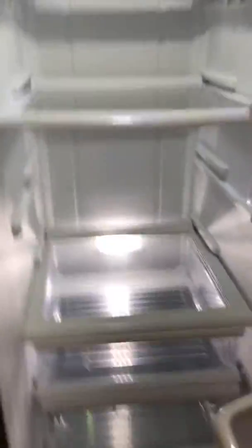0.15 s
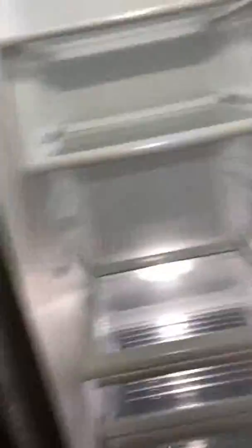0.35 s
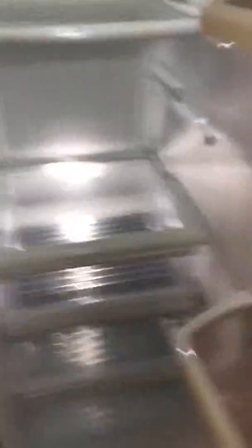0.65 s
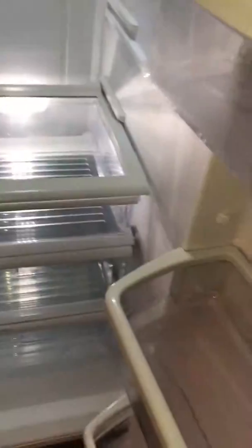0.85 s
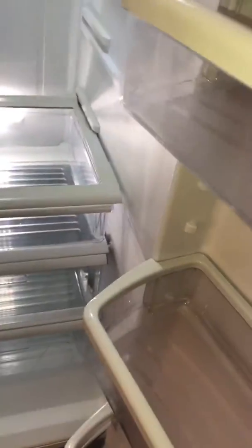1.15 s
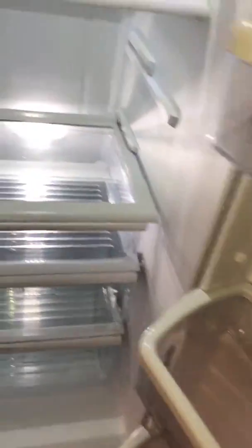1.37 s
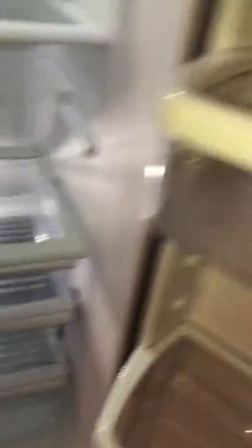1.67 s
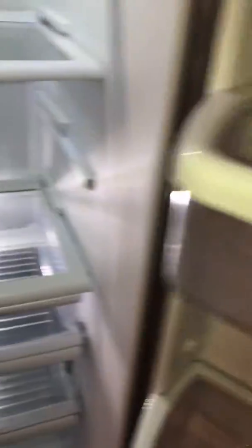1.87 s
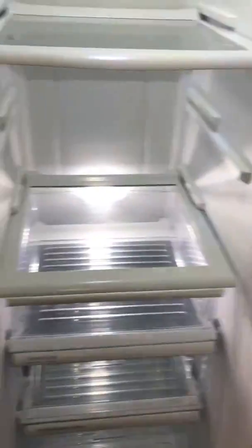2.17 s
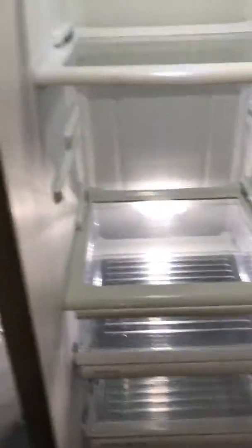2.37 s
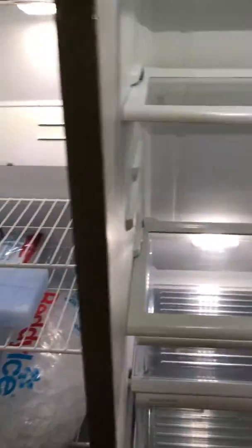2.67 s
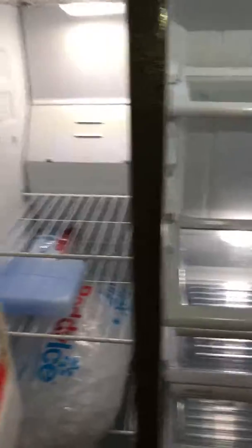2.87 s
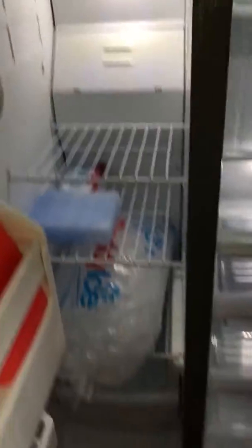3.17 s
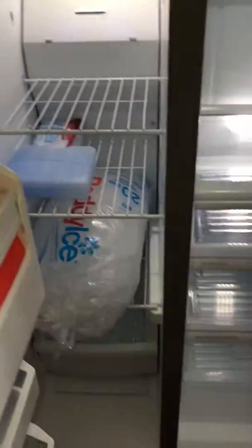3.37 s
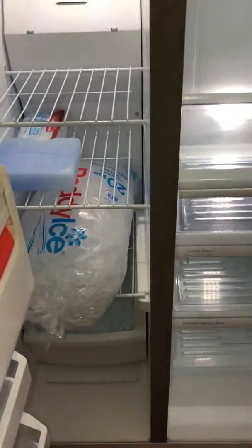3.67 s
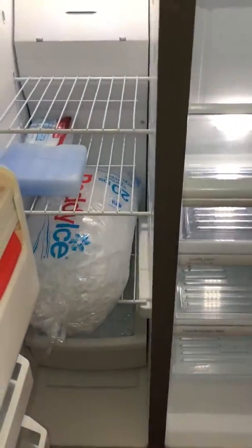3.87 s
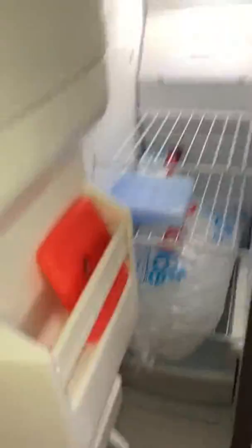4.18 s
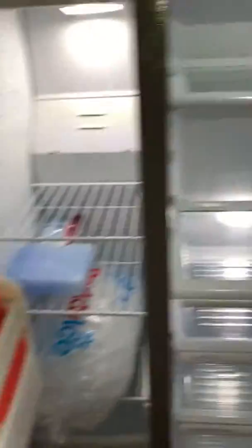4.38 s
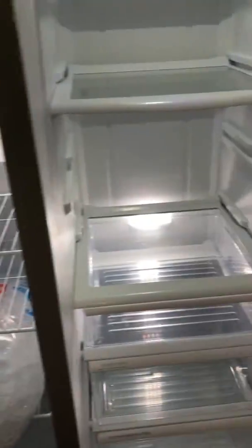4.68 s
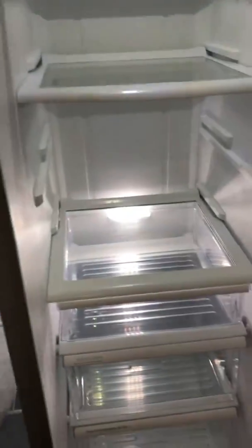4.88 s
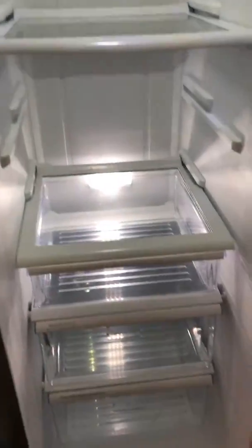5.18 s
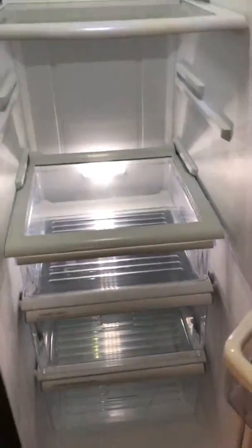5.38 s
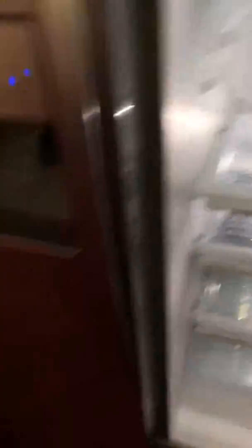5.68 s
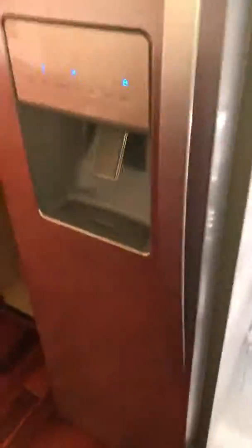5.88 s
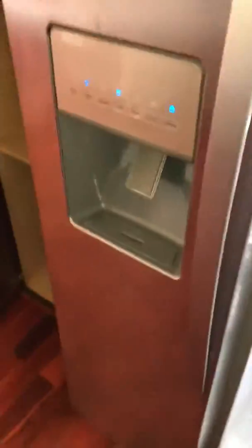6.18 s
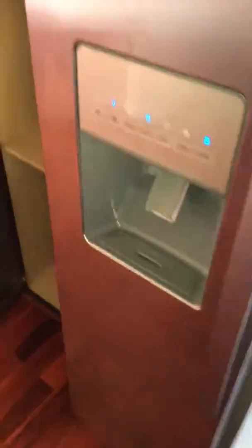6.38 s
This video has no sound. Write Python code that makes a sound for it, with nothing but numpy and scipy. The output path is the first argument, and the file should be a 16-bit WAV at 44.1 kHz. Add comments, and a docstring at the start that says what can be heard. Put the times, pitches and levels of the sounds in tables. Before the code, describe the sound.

Close handling of a refrigerator: hands and rubber seals rub and crackle while plastic bins tick and knock. A door swings with a rattling, deep thump, then things settle to soft thuds and scattered clicks over low hum and airy noise. After a shelf clinks, one door is slammed with a sharp smack and a bassy thud that echoes briefly in the kitchen. A little rustling and a last click follow.

```python
"""Round an open refrigerator

Someone walks round an open refrigerator in a kitchen, swings its doors and shuts one with a slam.
Impacts on plastic bins and gaskets click and knock; doors and steps thud as damped oscillations and
drive the modes of the panels. Friction of hands and rubber seals gives rumble, scuff and crackle.
The room reverberates briefly after each blow, over the refrigerator's low hum and air noise."""
import sys
import numpy as np
from scipy import signal
from scipy.fft import rfft, irfft
from scipy.io import wavfile

SR = 44100
rng = np.random.default_rng(int(sys.argv[2]) if len(sys.argv) > 2 else 0)


def int16_out(signal):
    """Quantize to a 16-bit WAV file."""
    q = np.round(np.clip(np.atleast_2d(signal).T, -1, 1) * 32767)
    wavfile.write(sys.argv[1], SR, q.astype(np.int16))


N = 288414


def from_db(db):
    """Amplitude ratio of a level in decibels."""
    return 10 ** (np.asarray(db) / 20)


def rms_one(x):
    """Normalisation to rms 1."""
    return x / np.sqrt(np.mean(x ** 2) + 1e-20)


def at_hz(points, hz, column=1):
    """Interpolation of a table column on a logarithmic frequency axis."""
    points = np.array(points)
    return np.interp(np.log(hz), np.log(points[:, 0]), points[:, column])


def band(x, low_hz, high_hz):
    """Butterworth band-pass filtering."""
    return signal.sosfilt(signal.butter(2, [low_hz, high_hz], "band", fs=SR, output="sos"), x)


def coloured(x, spectrum):
    """Spectral shaping of a white signal, at rms 1."""
    hz = np.maximum(np.fft.rfftfreq(N, 1 / SR), 1)
    return rms_one(irfft(rfft(x) * from_db(at_hz(spectrum, hz)), N))


def drift(rate_hz):
    """Slow random modulation: low-passed noise at rms 1."""
    step, settle = 40, 2000
    pole = np.exp(-2 * np.pi * rate_hz * step / SR)
    white = rng.standard_normal(N // step + settle + 2)
    slow = signal.lfilter([1], [1, -2 * pole, pole * pole], white)[settle:]
    return np.interp(np.arange(N) / step, np.arange(len(slow)), rms_one(slow))


def ring(force, hz, t60):
    """Damped resonator: a unit impulse starts a decaying sine of amplitude 1."""
    radius, angle = from_db(-60 / (t60 * SR)), 2 * np.pi * hz / SR
    return signal.lfilter([0, np.sin(angle)], [1, -2 * radius * np.cos(angle), radius ** 2], force + 1e-18)


def refrigerator():
    """Superposition of compressor hum, lamp-supply whine, wavering air noise and the freezer fan's hiss."""
    # compressor tones: (frequency [Hz], rms level [dB])
    hum_tones = [(118.4, -74), (355.3, -78)]
    # hiss of the open freezer's fan, heard when close by: (time [s], level [dB])
    fan_levels = [(3.4, -96), (3.55, -79), (3.95, -88), (4.3, -95), (4.6, -91)]
    # spectrum of the moving air: (frequency [Hz], relative density [dB])
    air_spectrum = [(15, -41), (25, -2.5), (108, -0.5), (177, 0.5), (288, -6.5), (358, -5.5), (568, -14),
                    (1220, -20.5), (3150, -29.5), (3700, -31), (11000, -40), (15200, -40), (16500, -59)]
    t = np.arange(N) / SR
    whine_hz, fan_band_hz = 12662, (3200, 4400)
    hum = sum(np.sqrt(2) * from_db(db) * np.sin(2 * np.pi * hz * t) for hz, db in hum_tones)
    whine = from_db(-99 + 3 * drift(0.8)) * np.sin(2 * np.pi * whine_hz * t)
    fan_gain = from_db(np.interp(t, *np.transpose(fan_levels)))
    fan = fan_gain * rms_one(band(rng.standard_normal(N), *fan_band_hz))
    air = from_db(-61 + 1.3 * drift(2.8)) * coloured(rng.standard_normal(N), air_spectrum)
    return air + hum + whine + fan


def rubbing():
    """Friction noise: panel rumble, scuff and dense crackle swell, hold and decay with each stroke."""
    # strokes of hands, seals and bins: (start [s], hold [s], rumble [dB], scuff [dB], crackle [dB])
    strokes = [(0.0, 0.12, -64, -68, -79), (0.24, 0.084, -72, -76, -70.5), (0.389, 0.059, -47, -82, -67),
               (0.5, 0.064, -51.5, -92, -74.5), (0.62, .18, -76, -93, -74.5), (0.9, .22, -66, -88, -83),
               (1.13, .19, -59, -50.5, -67), (1.271, 0.16, -51, -64.5, -61.5),
               (1.43, 0.19, -74, -56.5, -51.5), (1.55, .14, -50, -56, -57), (1.78, 0.31, -59.5, -77, -76),
               (1.968, .16, -30.5, -43.5, -53), (2.169, 0.32, -51.5, -68, -65.5),
               (2.72, 0.39, -70, -81, -76.5), (3.29, 0.19, -55, -69.5, -93), (4.43, 0.086, -50.5, -64, -79),
               (4.5, 0.16, -77, -73, -81), (4.9, 0.52, -72, -75, -80), (5.41, 0.091, -40.5, -74.5, -79),
               (5.56, .13, -48, -53.5, -67.5), (5.74, 0.063, -30.5, -43.5, -59),
               (5.84, 0.17, -44.5, -60.5, -67), (6.03, 0.16, -58, -67, -68),
               (6.22, 0.08, -44.5, -71.5, -89), (6.34, 0.15, -69.5, -73, -82)]
    # decay after a stroke, one row each for rumble, scuff and crackle: (rate [dB/s])
    fade_rates = [
        [137],
        [93],
        [360],
    ]
    # spectrum of the scuffing: (frequency [Hz], relative density [dB])
    scuff_spectrum = [(150, -25.5), (250, 1.5), (426, 2), (617, 1), (1530, -3.5), (2100, -5.5), (3670, -10),
                      (6000, -19), (7800, -53.5), (13200, -120)]
    # spectrum of the crackle: (frequency [Hz], relative density [dB])
    crackle_spectrum = [(1760, -36.5), (3000, 2.5), (3240, -1), (4000, -4.5), (5800, -1), (8470, -4),
                        (15500, -4.5)]
    swell_s, grains_per_s = 0.025, 900
    gains = np.zeros((3, N))
    for start, hold, *levels_db in strokes:
        i = round(start * SR)
        t = np.arange(min(N - i, SR)) / SR
        swell = np.minimum(t / swell_s, 1)
        gains[:, i:i + len(t)] += swell * from_db(np.c_[levels_db] - fade_rates * np.maximum(t - hold, 0))
    rumble = band(rng.standard_normal(N), 69, 220) * from_db(6.4 * drift(3.2))
    scuff = coloured(rng.standard_normal(N), scuff_spectrum) * from_db(2 * drift(20))
    grain_onsets = rng.random(N) < grains_per_s * from_db(5 * drift(20)) / SR
    grains = grain_onsets * from_db(6.87 * np.minimum(rng.exponential(1, N), 5))
    grainy_noise = rng.standard_normal(N) * (1 + 0.82 * grains)
    crackle = coloured(grainy_noise, crackle_spectrum) * from_db(1.2 * drift(40))
    return gains[0] * rms_one(rumble) + gains[1] * rms_one(scuff) + gains[2] * rms_one(crackle)


def knocks():
    """Impact noise: each knock, tick or scrape is a decaying burst of tiny contacts in three bands.
    Returns the direct sound, the clicks sent to the walls and the impulses on the panels."""
    # knocks of bins, latch and gasket: (time [s], snap level [dB], snap frequency [Hz],
    # hollow level [dB], hollow frequency [Hz], fizz level [dB], gain to walls and panels [dB])
    hollow_knocks = [ (0.308, -59, 3160, -55, 494, -68, 1), (0.4204, -40.5, 1780, -49, 537, -70, -31),
                     (0.512, -72, 2200, -50, 700, -80, -10), (1.1352, -45.5, 1850, -41, 810, -49.5, 1),
                     (1.376, -51.5, 1840, -55, 565, -43.5, -10), (1.4805, -44.5, 2960, -48.5, 517, -45, 11),
                     (1.55, -55, 4500, -53, 550, -44, -5), (1.6312, -39, 4670, -43, 520, -35.5, -3),
                     (1.66, -40.5, 3200, -37.5, 770, -41.5, 6.5), (1.9723, -34.5, 3750, -36, 593, -32, 1),
                     (1.996, -39, 1940, -34.5, 1270, -46, -10), (2.0416, -44, 2500, -33, 780, -45, 3),
                     (2.088, -23.5, 4100, -31.5, 1510, -27, -2), (2.265, -46.5, 4570, -45, 1305, -50, -12),
                     (2.3193, -52, 4030, -57, 730, -56, -8), (2.4464, -51, 3330, -59, 1500, -51, -7),
                     (2.9254, -43.5, 2370, -51, 1070, -50, 1), (3.2875, -71, 1650, -62, 766, -62, 7),
                     (3.5056, -64, 4450, -74, 861, -63.5, -4), (4.415, -39, 3770, -60, 760, -45.5, -4),
                     (4.5008, -43, 3520, -43, 1010, -44.5, 3.5), (5.114, -66, 3500, -70, 694, -76, -1),
                     (5.4607, -63.5, 4500, -59, 541, -66.5, -7), (5.5193, -42, 3350, -48, 900, -44.5, 0),
                     (5.5831, -36, 2035, -37.5, 1505, -53, 3.5), (5.687, -27.5, 2070, -28, 1070, -46, 13),
                     (5.6985, -15.5, 4060, -21.5, 1100, -15.5, 0),
                     (6.331, -42, 3400, -43, 1000, -47.5, 7.5)]
    # dry ticks of plastic and gasket: (time [s], snap level [dB], snap frequency [Hz], fizz level [dB])
    ticks = [(0.4783, -50, 2240, -69), (0.748, -49, 4800, -58), (0.7816, -39.5, 3900, -52),
             (1.269, -39, 2040, -60), (1.2924, -53, 2170, -58), (1.346, -54, 2680, -45),
             (1.363, -60, 2140, -39.5), (1.4217, -44, 2440, -45), (1.8824, -71, 2010, -59),
             (2.1652, -47, 2000, -43), (4.1724, -60, 1570, -80), (4.84, -62.5, 4040, -56),
             (5.4, -61, 3460, -62), (6.1007, -39, 2400, -65)]
    # short scrapes: (time [s], snap level [dB], snap frequency [Hz], hollow level [dB], fizz level [dB])
    scrapes = [(0.262, -56, 4020, -67, -64), (0.4011, -45, 1860, -35.5, -54), (0.4354, -58, 1900, -68, -54),
               (0.46, -57, 4500, -63, -67), (0.5403, -56.5, 2550, -66, -62),
               (0.7945, -55.5, 2980, -64, -77), (1.958, -47, 4370, -51, -32),
               (2.803, -58.5, 1750, -63, -66), (3.328, -67, 1530, -44, -75.5),
               (5.3874, -66, 1510, -50.5, -70.5), (6.1194, -52, 3580, -65, -60.5)]
    # kinds of contact: (t60 [s], rise [s]); tick and scrape also (gain to walls and panels [dB])
    knock, tick, scrape = (0.081, 0.0014), (0.015, 0.0003, -8.5), (0.093, 0.009, -13.5)
    scrape_hollow_hz, rap_db = 680, -15.5
    events = [(*row, *knock, send_db) for *row, send_db in hollow_knocks]
    events += [(*row, -np.inf, scrape_hollow_hz, fizz_db, *tick) for *row, fizz_db in ticks]   # no hollow
    events += [(*row, scrape_hollow_hz, fizz_db, *scrape) for *row, fizz_db in scrapes]
    direct, to_walls, rap = np.zeros((3, N + SR))
    t = np.arange(SR // 4) / SR
    click = (t == 0) + 1e-18
    for start, snap_db, snap_hz, hollow_db, hollow_hz, fizz_db, t60, rise, send_db in events:
        i = round(start * SR)
        fizz_top_hz = min(85 / rise, 18000)   # slow scrapes are duller than sharp ticks
        # (level [dB], low edge [Hz], high edge [Hz], t60 [s], polarity that joins adjacent bands)
        bands = [(snap_db, snap_hz / 1.605, snap_hz * 1.5, t60, 1),
                 (hollow_db, hollow_hz / 2.46, hollow_hz * 1.38, 1.5 * t60, -1),
                 (fizz_db, 5000, fizz_top_hz, 0.7 * t60, -1)]
        for level_db, low, high, band_t60, polarity in bands:
            envelope = from_db(level_db - 60 * t / band_t60) * (1 - np.exp(-t / rise))
            direct[i:i + len(t)] += rms_one(band(rng.standard_normal(len(t)), low, high)) * envelope
            # the burst's energy gathered into one click
            wall_click = rms_one(band(click, low, high)) * np.sqrt(np.mean(envelope ** 2))
            to_walls[i:i + len(t)] += polarity * wall_click * from_db(send_db)
        rap[i] += from_db(hollow_db + send_db + rap_db)
    return direct[:N], to_walls[:N], rap[:N]


def panels(force):
    """Modal response: door and cabinet ring as a sum of damped resonators."""
    # modes of door and cabinet: (frequency [Hz], gain [dB], t60 [s])
    modes = [(64, -20, 0.6), (88.8, -7.5, 0.38), (108, -11.5, 0.25), (158.9, -16, 0.36), (240, -5.5, 0.19),
             (292, -13.5, 0.41), (323, -4, 0.16), (453.5, -23, 0.28), (537, -17.5, 0.23), (590, -20.5, .25),
             (693, -25, .2), (770, -9, .2), (886, -26.5, .2), (1014, -22, 0.19), (1310, -34.5, .15)]
    return sum(from_db(db) * ring(force, hz, t60) for hz, db, t60 in modes)


def thuds():
    """Damped oscillation, one sine per thud or tap. Returns the sound and the thuds' push on the panels."""
    # thuds of doors and steps: (time [s], level [dB], frequency [Hz], t60 [s])
    blows = [(0.32, -43, 108, 0.097), (0.406, -44, 294, 0.1), (0.505, -50, 226, 0.17),
             (0.751, -35, 102, 0.082), (0.905, -45, 183.4, 0.22), (1.188, -42, 107, 0.22),
             (1.244, -36, 78, 0.21), (1.342, -35, 69, 0.12), (1.64, -23.5, 161.5, 0.077),
             (1.657, -37, 63, 0.12), (1.752, -38.5, 101.2, 0.28), (1.977, -29, 206, 0.1),
             (2.016, -19.5, 100.4, 0.11), (2.045, -27.5, 226, 0.16), (2.059, -12.5, 90.3, 0.089),
             (2.101, -22, 85, 0.15), (2.269, -33, 96, 0.054), (3.3, -36, 92.4, 0.34),
             (3.335, -29, 71.5, 0.15), (3.42, -41, 92, 0.1), (4.426, -38, 216, 0.18),
             (4.445, -37, 127, 0.084), (4.507, -48.5, 64, 0.18), (5.51, -34, 199, 0.13),
             (5.704, -3.5, 122.4, 0.07), (5.722, -5.5, 90.7, 0.12), (6.098, -44.5, 92.6, 0.1),
             (6.149, -36.5, 109, .15), (6.29, -37, 200.5, .14)]
    # pitched taps on hollow bins: (time [s], level [dB], frequency [Hz], t60 before a 0.02 s floor [s])
    taps = [(0.408, -36, 620, 0.082), (0.418, -30, 526, 0.039), (0.511, -41.5, 368, 0.066),
            (1.138, -40.5, 590, 0.14), (1.337, -35.5, 337, 0.062), (1.664, -42, 590, 0.093),
            (1.997, -26, 390, .059), (2.041, -28, 573, .12), (4.172, -37.5, 427, 0.017),
            (5.493, -39, 386, 0.056), (5.705, -13.5, 589, 0.061), (5.707, -11, 316, 0.049),
            (5.727, -19, 678, 0.05), (6.103, -29, 430, 0.017)]
    thud_rise_s, tap_rise_share, push_db = 0.008, 0.013, -4.5
    sound, push = np.zeros((2, N + SR))
    t = np.arange(SR // 2) / SR
    swings = [(*row, thud_rise_s) for row in blows]
    swings += [(*row, max(t60, 0.02), max(tap_rise_share * t60, 0.0005)) for *row, t60 in taps]
    for start, level_db, hz, t60, rise in swings:
        i = round(start * SR)
        envelope = from_db(level_db - 60 * t / t60) * (1 - np.exp(-t / rise))
        sound[i:i + len(t)] += envelope * np.sin(2 * np.pi * hz * t)
    contact = t * np.exp(-8 * t / thud_rise_s)   # a soft contact excites few high modes
    for start, level_db, _, _ in blows:
        i = round(start * SR)
        push[i:i + len(t)] += from_db(level_db + push_db) * contact / contact.sum()
    return sound[:N], push[:N]


def shelf():
    """Impulse excitation: each hit drives every mode of a shelf with a slightly random strength."""
    # modes of the shelf: (frequency [Hz], gain [dB], t60 [s])
    modes = [(3480, 0, .16), (3640, -2, .12), (4200, -3, .1), (4650, -6, .07)]
    # knocks that set the shelf ringing: (time [s], level [dB])
    hits = [(4.416, -50), (4.503, -53), (6.333, -53)]
    times, hit_db = np.transpose(hits)
    scatter_db = 1.1 * rng.standard_normal((len(hits), len(modes)))
    sound = np.zeros(N)
    for (hz, mode_db, t60), offset_db in zip(modes, scatter_db.T):
        force = np.zeros(N)
        force[(times * SR).astype(int)] = from_db(hit_db + mode_db + offset_db)
        sound += ring(force, hz, t60)
    return sound


def kitchen(x):
    """Reverberation: convolution with noise that decays at its own rate in each half octave."""
    # diffuse field of the room: (frequency [Hz], t60 [s], relative level [dB])
    decay = [(60, 0.83, -4.5), (250, 0.6, 0), (1000, 0.46, -0.5), (2500, 0.29, -2), (3890, 0.5, 1),
             (5500, 0.55, -9.5), (7500, 0.28, 5), (11000, 0.19, 2), (16000, 0.18, 3)]
    build_up_s = 0.016
    t = np.arange(SR) / SR
    edges_hz = 40 * 2 ** np.arange(0, 9, 0.5)
    white, echoes = rng.standard_normal((2, SR)), np.zeros(SR)
    for k, (low, high) in enumerate(zip(edges_hz, edges_hz[1:])):
        centre_hz = np.sqrt(low * high)
        t60, level_db = at_hz(decay, centre_hz), at_hz(decay, centre_hz, column=2)
        echoes += band(white[k % 2], low, high) * from_db(level_db - 60 * t / t60)
    _, top_t60, top_db = decay[-1]
    echoes += band(white[0], edges_hz[-1], 22000) * from_db(top_db - 60 * t / top_t60)
    echoes *= np.minimum(t / build_up_s, 1)
    return signal.fftconvolve(x, echoes / np.sqrt(np.sum(echoes ** 2)))[:N]


def scene():
    """Superposition of blows, friction and their reverberation on the refrigerator's own noise."""
    knock, to_walls, rap = knocks()
    thud, push = thuds()
    friction = rubbing()
    background = refrigerator()
    body = thud + panels(push + rap) + friction + shelf()
    reverberation = from_db(-13.5) * kitchen(to_walls + body)
    return (knock + body + reverberation + background)[None]


def record(dry):
    """Band limiting: the small microphone loses the deepest bass, and the highest treble is cut."""
    bass_hz, stop_hz = 42, 16400
    thin = signal.sosfilt(signal.butter(4, bass_hz, "high", fs=SR, output="sos"), dry)
    return signal.sosfilt(signal.cheby2(14, 60, stop_hz, fs=SR, output="sos"), thin)


dry = scene()
out = record(dry)
int16_out(out)
```